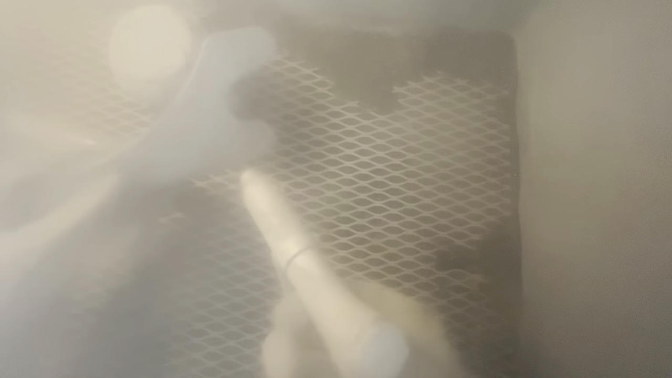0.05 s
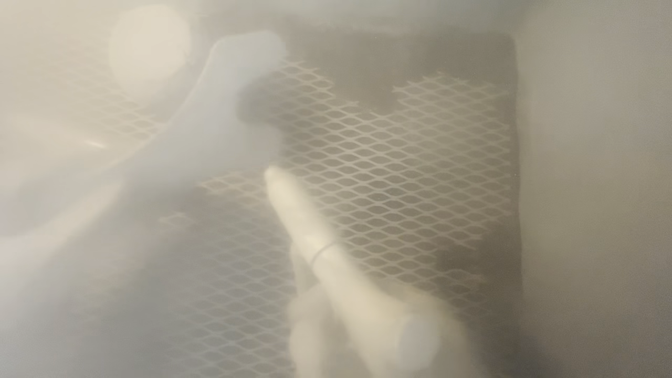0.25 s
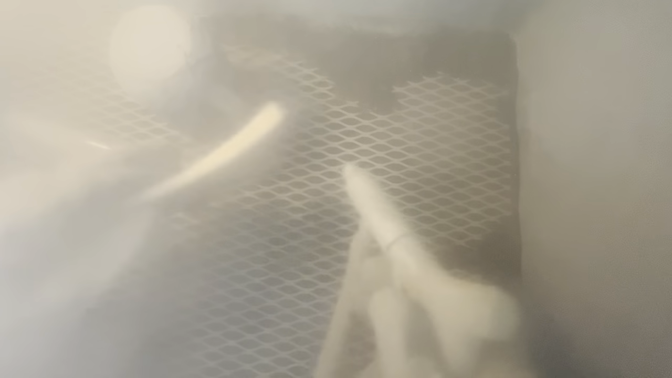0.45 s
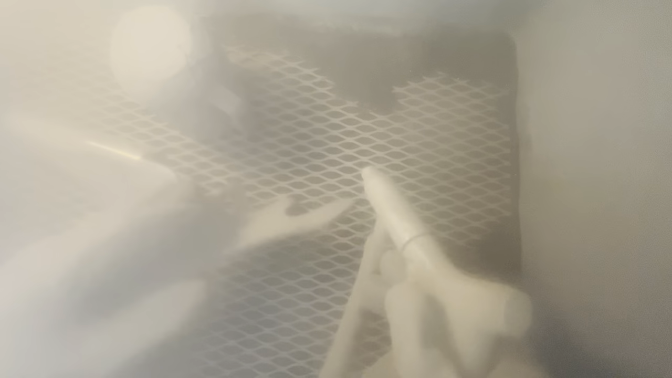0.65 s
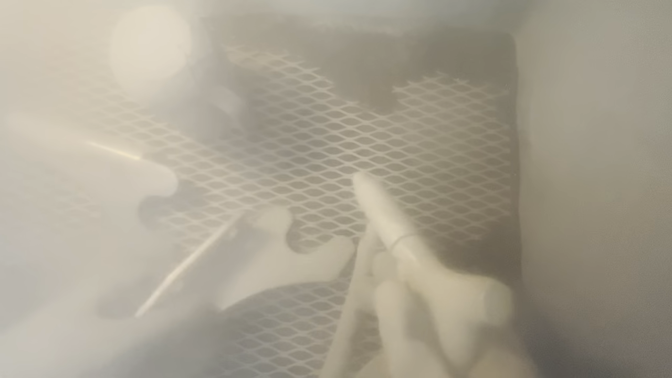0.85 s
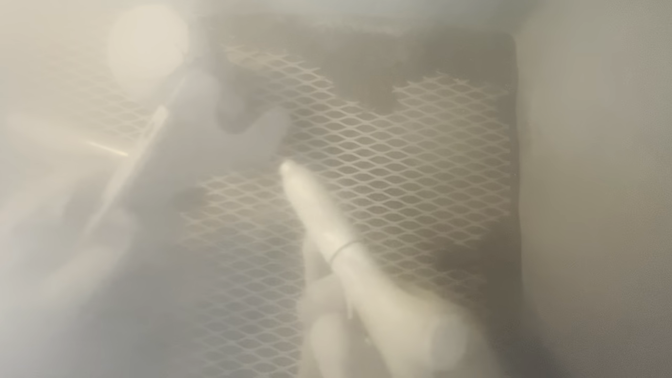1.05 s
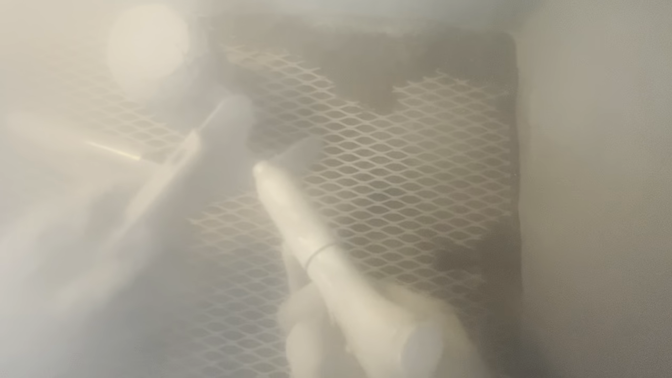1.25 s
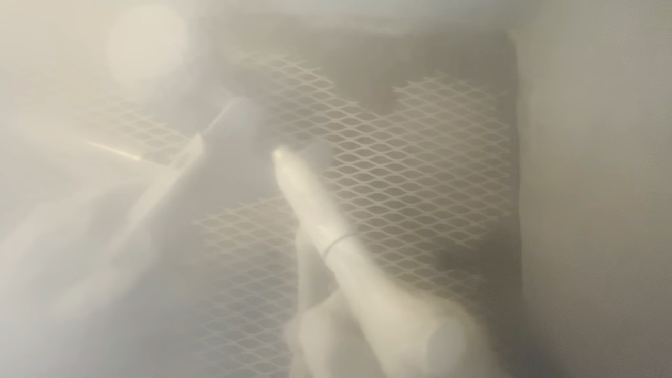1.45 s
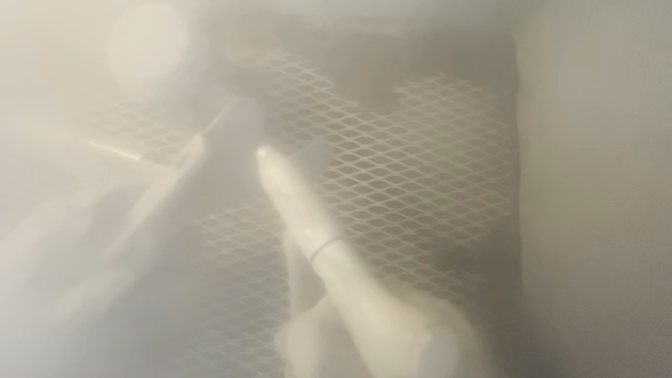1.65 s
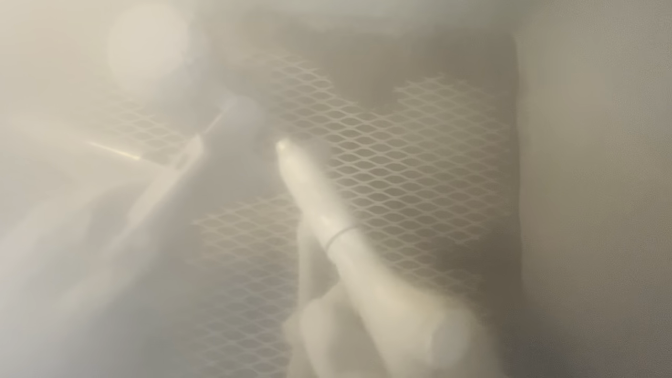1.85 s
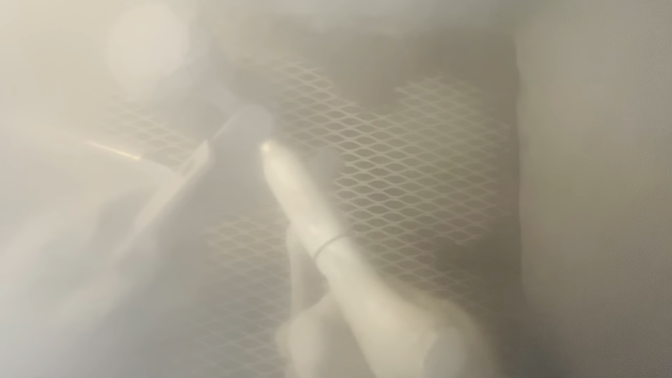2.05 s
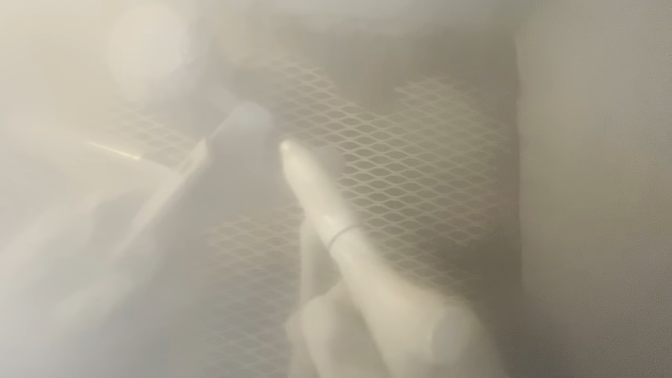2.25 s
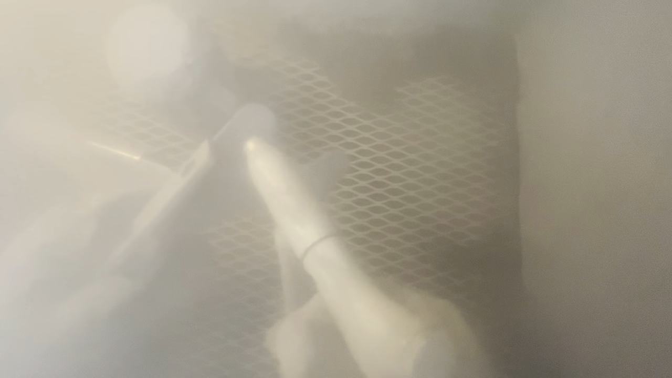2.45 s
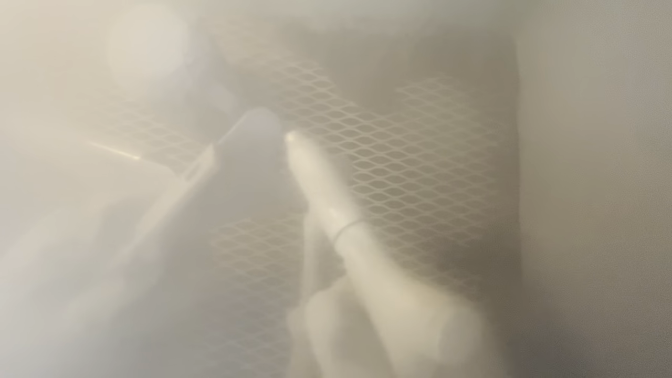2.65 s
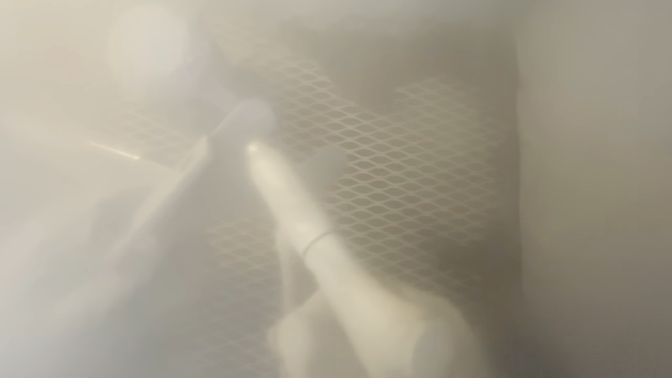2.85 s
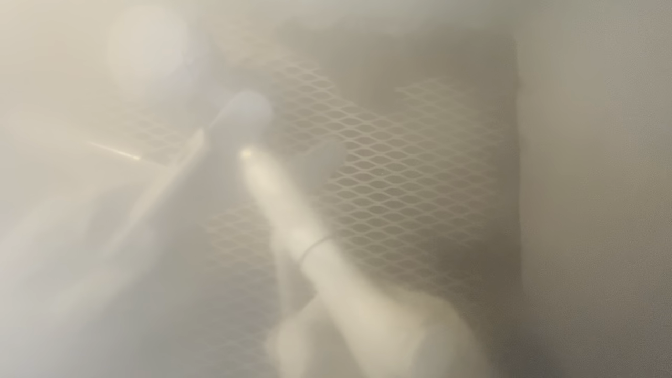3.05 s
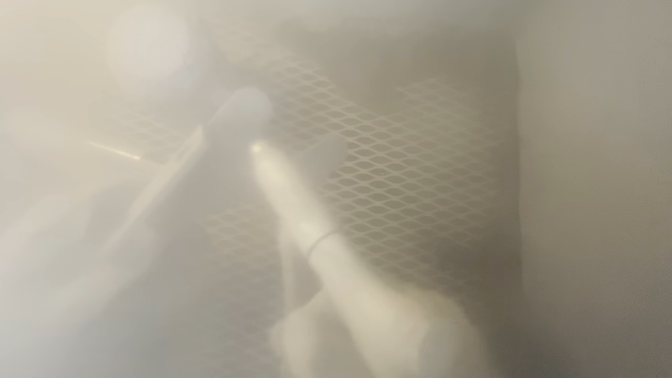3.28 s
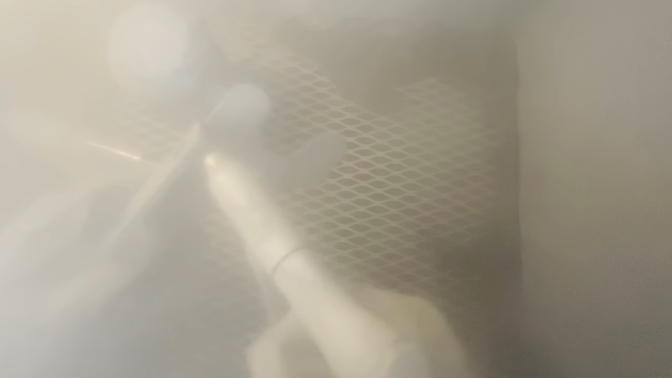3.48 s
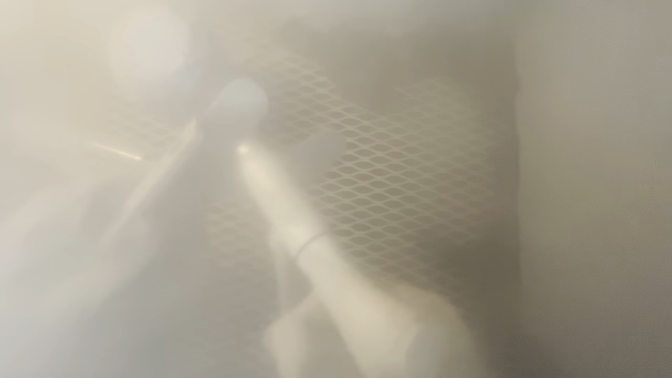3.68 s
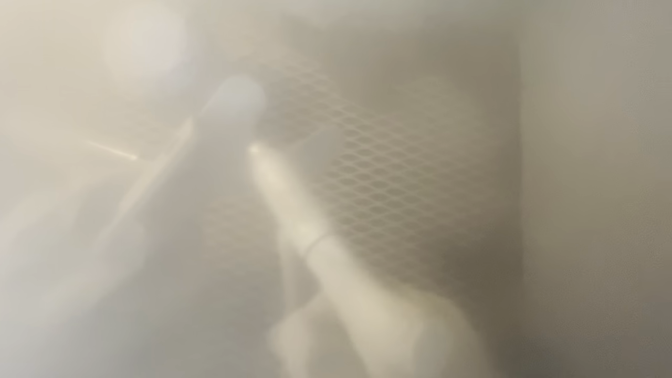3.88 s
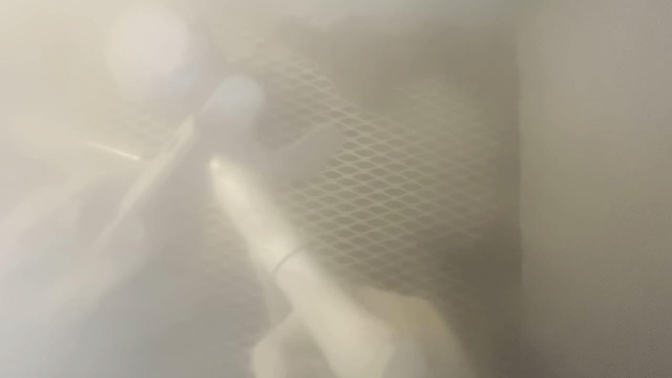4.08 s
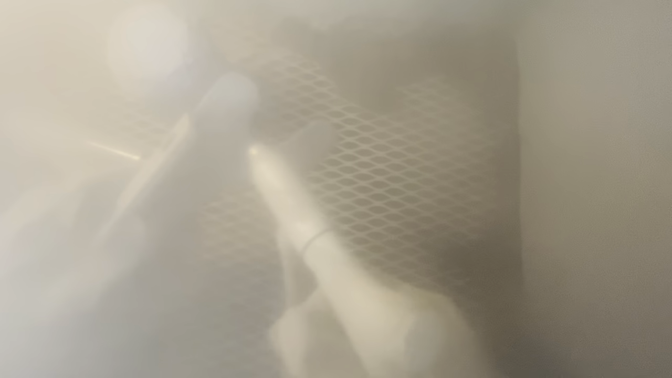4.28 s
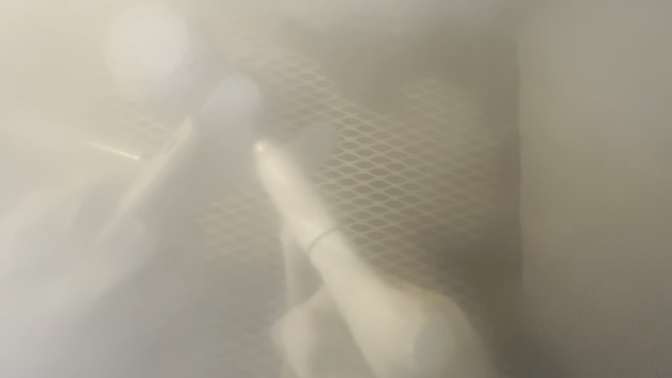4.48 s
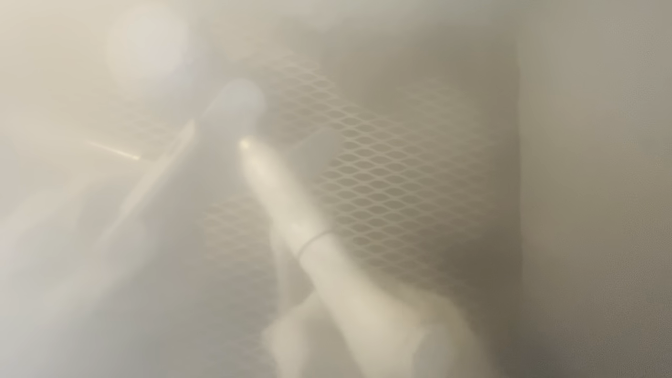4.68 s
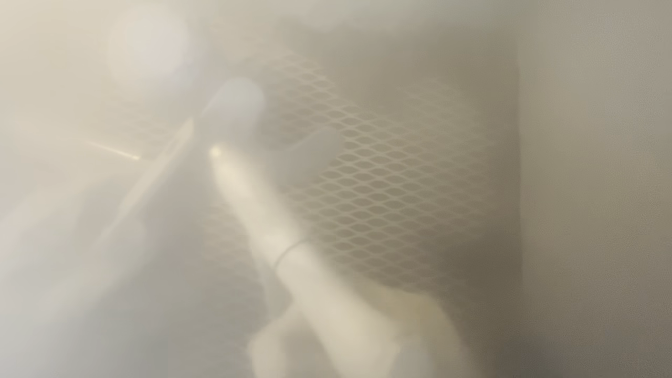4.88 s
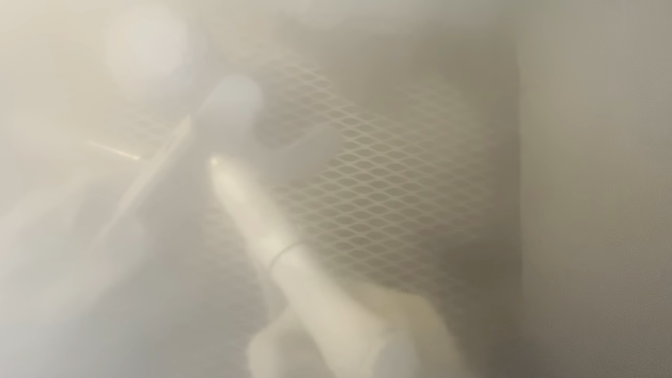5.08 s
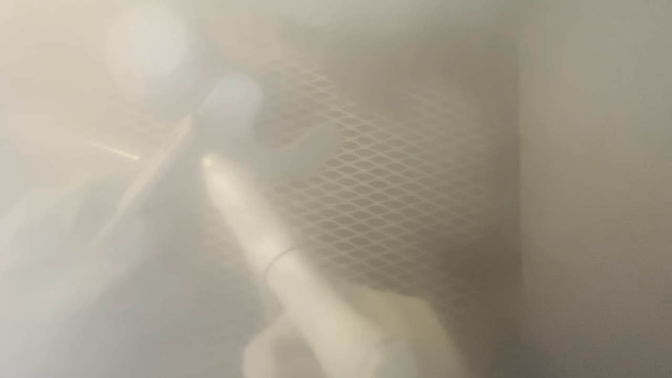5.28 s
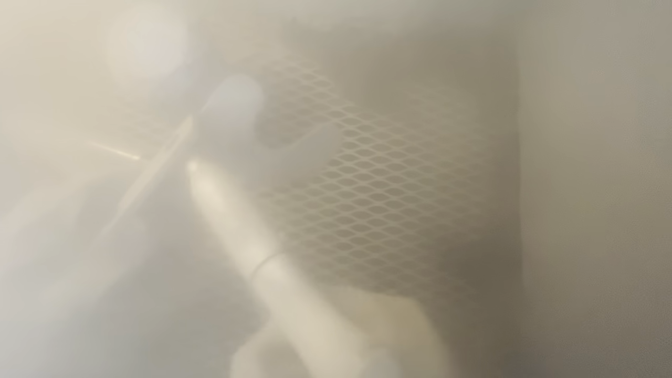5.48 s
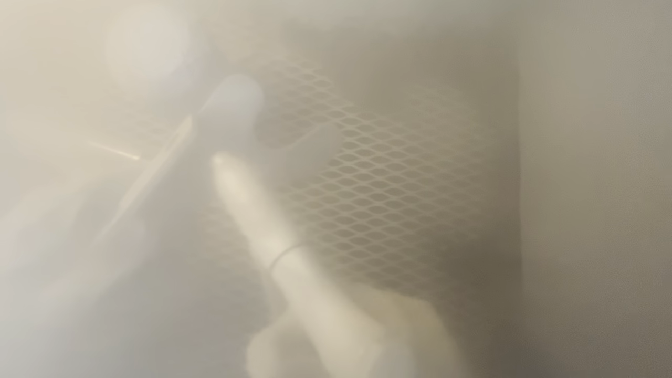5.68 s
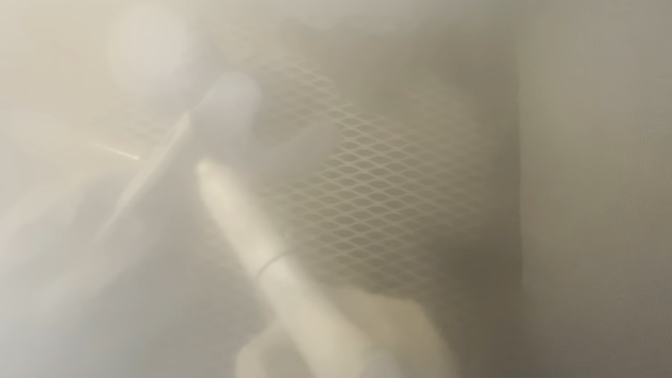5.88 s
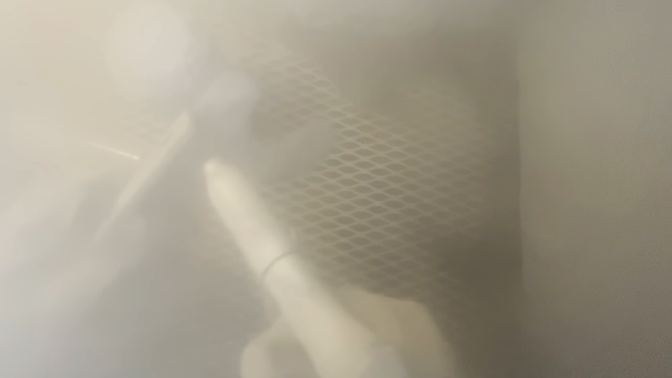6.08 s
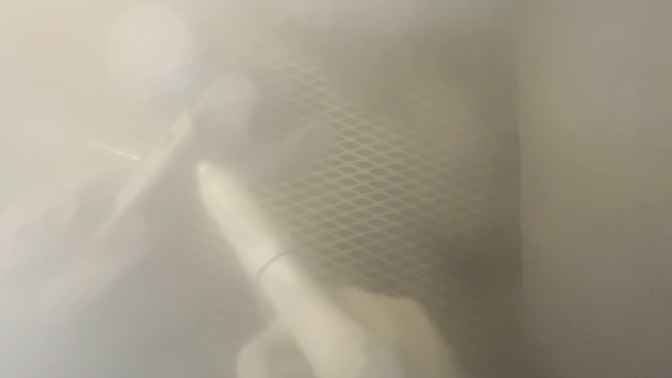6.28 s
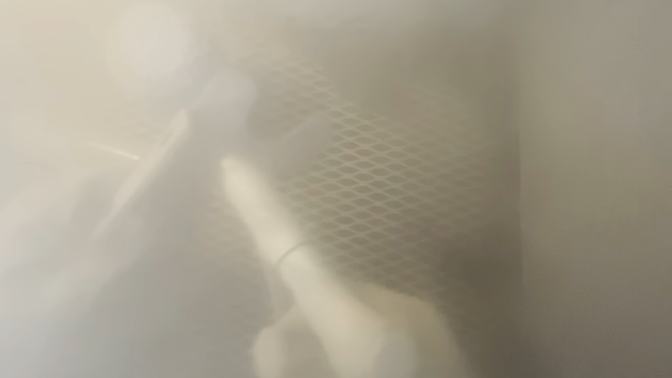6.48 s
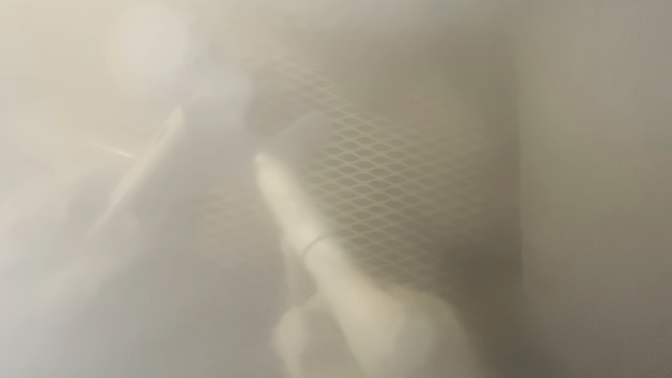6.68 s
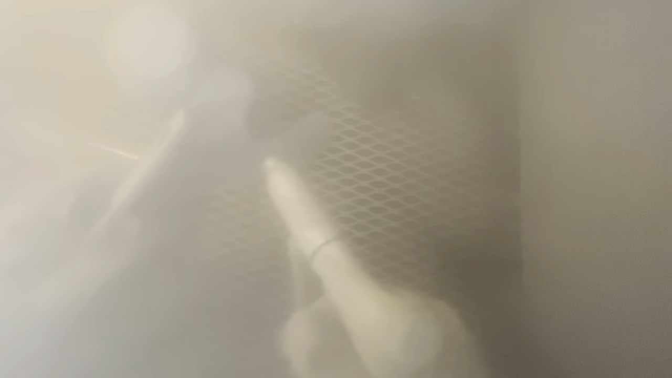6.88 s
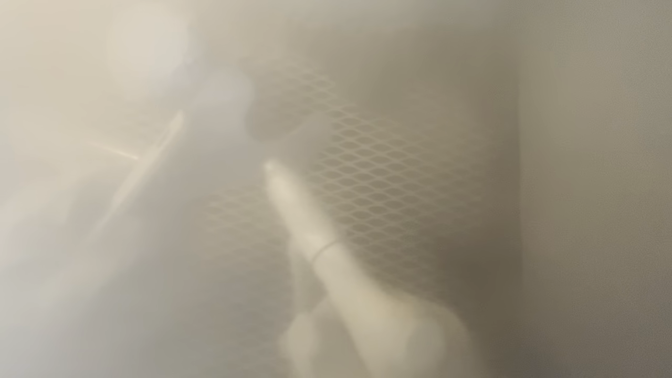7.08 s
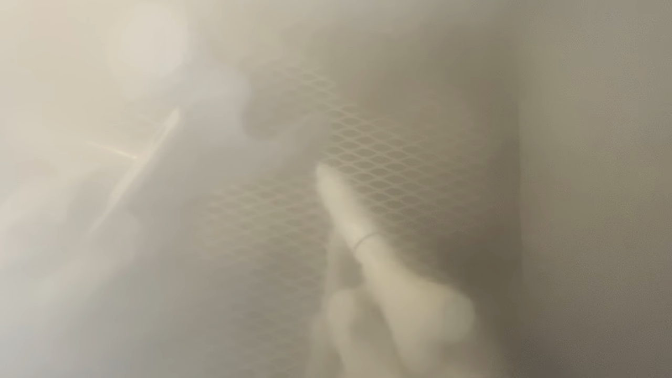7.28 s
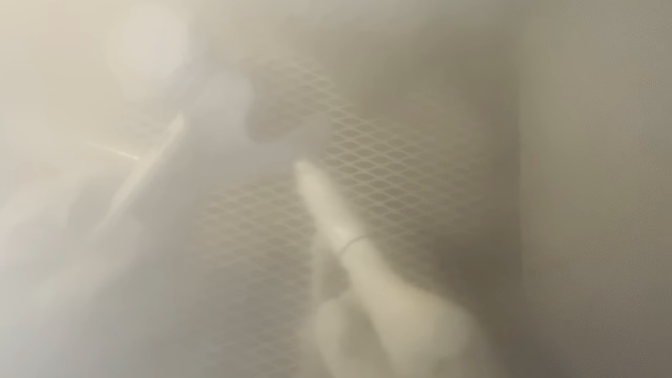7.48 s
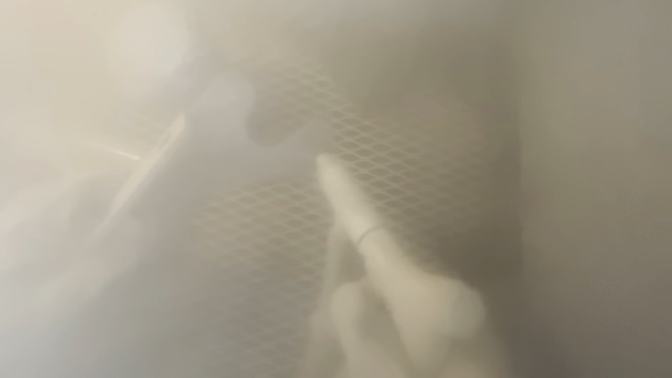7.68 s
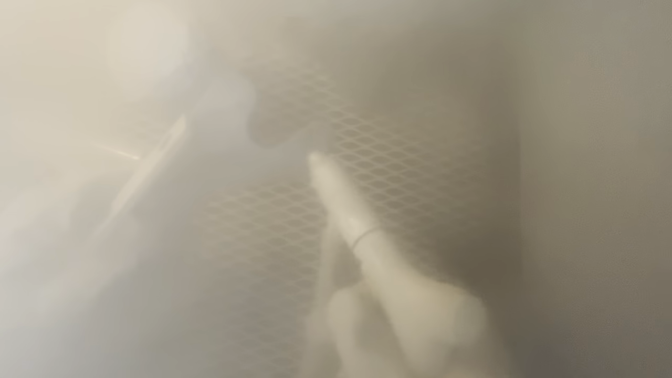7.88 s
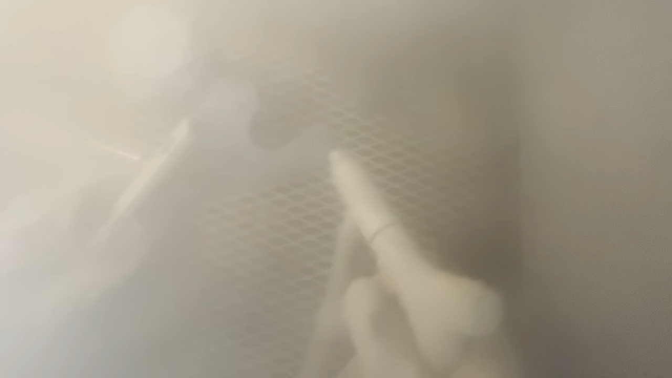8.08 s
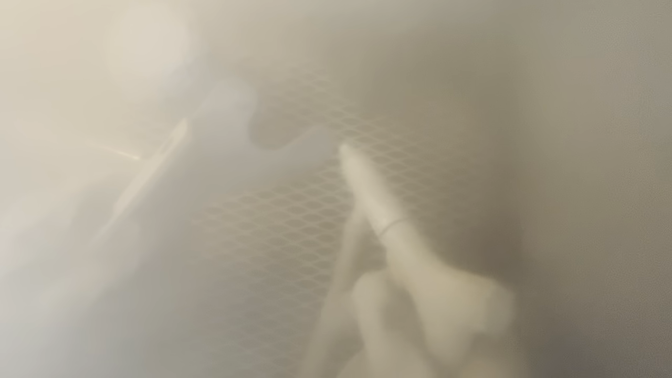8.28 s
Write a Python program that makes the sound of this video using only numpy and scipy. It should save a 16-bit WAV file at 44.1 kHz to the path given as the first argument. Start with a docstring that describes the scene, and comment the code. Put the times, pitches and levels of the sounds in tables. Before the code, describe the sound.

After soft airflow and two dull bumps, a sandblaster sprays grit on a steel part with a loud, steady hiss inside a cabinet.

```python
"""A garage, a stereo microphone close to a blast cabinet in which a steel part is sandblasted.
First air rushes through the cabinet; the part is turned and bumps twice. At 1.3 s the trigger opens
with a puff and the jet hisses on. From then on jet, grit and the roar of air on the part ring in the
cabinet, whose resonances change with the aim of the gun, while the tank slowly drains."""
import sys
import numpy as np
from scipy import signal
from scipy.fft import rfft, irfft
from scipy.io import wavfile
from scipy.ndimage import uniform_filter1d

SR = 44100
rng = np.random.default_rng(int(sys.argv[2]) if len(sys.argv) > 2 else 0)


def output_pcm(signal):
    """Save a mono or channel-first signal as 16-bit PCM at the path in sys.argv[1].

    Samples are clipped to [-1, 1] before scaling.
    """
    pcm = np.clip(np.atleast_2d(signal).T, -1, 1) * 32767
    wavfile.write(sys.argv[1], SR, np.round(pcm).astype(np.int16))


N = 367794
T = np.arange(N) / SR
HZ = np.maximum(np.arange(N // 2 + 1) * SR / N, 1)
TRIGGER_S = 1.264

# how idle air and scuffs reach the microphones: (frequency [Hz], left minus right [dB])
AIR_BALANCE = [(60, 0.96), (110, 4.6), (200, 4.5), (380, 6.4), (700, 1.9), (1290, 6.2), (2380, 0.83),
               (4400, 8.7), (8120, 4.8), (15000, 0.5)]
# how the blast reaches them: (frequency [Hz], left minus right [dB])
JET_BALANCE = [(60, 4), (200, 7), (380, 8), (700, -0.5), (1290, 2), (1800, 11), (2800, 6), (4200, 5.5),
               (5600, 14), (7200, 9.5), (8800, -1.5), (10000, -2.5), (12000, 0)]
# modes of the bumped cabinet: (frequency [Hz], width [Hz], relative level [dB])
BUMP_MODES = [(121, 40, -12), (168, 27, -7), (257, 27, 2), (340, 46, -5), (393, 32, 1.5), (525, 50, -11),
              (920, 58, 0.5), (1164, 45, -2), (1400, 50, 0), (1510, 57, 0), (1680, 70, -7), (1890, 130, -7),
              (2320, 120, -12)]


def undb(db):
    """Decibels to gain."""
    return 10 ** (np.asarray(db) / 20)


def unit(x):
    """Scale so that the mean of the channels has rms 1."""
    return x / np.std(np.atleast_2d(x).mean(axis=0))


def curve(rows, column=1):
    """One column of a table, joined by straight lines in time."""
    rows = np.array(rows)
    return np.interp(T, rows[:, 0], rows[:, column])


def across(points):
    """(frequency [Hz], value) points joined on a log-frequency axis."""
    hz, value = np.transpose(points)
    return np.interp(np.log(HZ), np.log(hz), value)


def bell(hz, width):
    """Power response of one resonance."""
    return 1 / (1 + (2 * (HZ - hz) / width) ** 2)


def colour(x, gain):
    """Filter by a gain at each frequency."""
    return irfft(rfft(x) * gain, N)


def ramp(start, length):
    """Rises from 0 to 1."""
    return np.clip((T - start) / length, 0, 1)


def walk(rate):
    """Smooth random drift with spread 1, changing about rate times a second."""
    step = max(int(SR / rate), 1)
    held = rng.standard_normal(8192)[np.arange(N) // step % 8192]
    return unit(uniform_filter1d(held, step))


def blows(rows):
    """Force of soft contacts: each swells and dies away."""
    return sum(undb(db) * np.exp(-np.maximum((s - T) / rise, (T - s) / decay))
               for s, db, rise, decay in rows)


def noise():
    """Unrelated turbulence for left and right."""
    return rng.standard_normal((2, N))


def at_mics(x, gain, balance, alike=1):
    """Colour a source and place it between the two microphones; rms 1."""
    # how alike the two sides hear when alike is 1: (frequency [Hz], correlation)
    likeness = [(40, .2), (130, .45), (300, .7), (500, .35), (900, .6), (1300, .92), (1800, .92),
                (2400, .45), (9000, .5), (11000, .85), (15000, .85)]
    turn = np.arcsin(np.clip(alike * across(likeness), -.95, .95)) / 2
    spectrum = rfft(x)
    spectrum = np.cos(turn) * spectrum + np.sin(turn) * spectrum[::-1]
    sides = undb(across(balance) * np.array([[.5], [-.5]]))
    return unit(irfft(spectrum * gain * sides / np.hypot(*sides), N))


def reflections(t60, wet):
    """Response of the steel box at each microphone: direct sound and a short dense tail."""
    tail = rng.standard_normal((2, 8192)) * undb(-60 * T[:8192] / t60)
    tail /= np.linalg.norm(tail, axis=1, keepdims=True)
    return (1 + wet * rfft(tail, N)) / np.hypot(1, wet)


def idle_air(leak_db=-40, rush_db=-36, rush_end_s=.57):
    """Air streams through the cabinet before the trigger, with a deeper rush at first."""
    # spectra of the two streams: (frequency [Hz], relative level [dB])
    leak_spectrum = [(25, -14), (50, -1.5), (120, -3), (170, -12), (340, -2), (570, -7.5), (800, -3),
                     (1150, -0.5), (1450, -2), (1800, -7.5), (2500, -10.5), (3300, -16), (4900, -12.5),
                     (9000, -20), (12000, -27.5), (15000, -33)]
    rush_spectrum = [(30, -43), (70, -6), (120, -8), (190, -10), (260, -1), (340, 1), (440, 1), (600, -3),
                     (780, 1.5), (1000, -6.5), (1450, -4.5), (1750, -16), (3000, -28), (8000, -45)]
    # the level dips briefly: (time [s], level [dB])
    dip = [(.525, 0), (.545, -12), (.555, -35), (.565, -19), (.587, -0.5)]
    box = reflections(t60=.087, wet=.56)
    leak = at_mics(noise(), undb(across(leak_spectrum)) * box, AIR_BALANCE, alike=.3)
    leak *= undb(leak_db + .17 * walk(8.2)) * (1 - ramp(TRIGGER_S, .37))
    rush = at_mics(noise(), undb(across(rush_spectrum)) * box, AIR_BALANCE, alike=.5)
    rush *= undb(rush_db + .3 * walk(19)) * (1 - ramp(rush_end_s, .023))
    return (leak + rush) * undb(curve(dip))


def wall_thuds(wall_hz=114):
    """The cabinet wall thuds softly, hardest under the first puff of air."""
    # pushes on the wall: (time [s], level [dB], rise [s], decay [s])
    thuds = [(.59, -38, 0.0067, 0.0091), (.771, -41, 0.0063, 0.018), (1.283, -27, 0.0048, 0.012),
             (3.27, -51, .025, .04), (4.2, -51, .03, .07), (4.535, -48, 0.011, 0.046)]
    return np.sqrt(2) * np.sin(2 * np.pi * wall_hz * T) * blows(thuds)


def scuffs(dull_hz=3200, floor_db=-20):
    """The part scuffs as it bumps and is turned: friction noise through the cabinet's modes."""
    # soft contacts: (time [s], level [dB], rise [s], decay [s])
    bumps = [(.744, -23.5, 0.0063, 0.012), (.769, -38, 0.0065, 0.0071), (.8, -41, .004, 0.04),
             (.905, -34, 0.0081, 0.015)]
    mode_power = sum(undb(db) ** 2 * bell(hz, width) for hz, width, db in BUMP_MODES)
    body = np.sqrt(undb(floor_db) ** 2 + mode_power)
    return at_mics(noise(), body / (1 + (HZ / dull_hz) ** 2), AIR_BALANCE) * blows(bumps)


def knocks(soft_hz=1500):
    """Each contact sets the cabinet's modes ringing; the gloved grip softens the blow."""
    # hard contacts within the bumps: (time [s], relative level [dB])
    contacts = [(0.744, -34), (0.757, -33), (0.769, -33), (0.9052, -35), (.913, -37)]
    age = T[:SR // 2]
    ring = sum(undb(db) * np.exp(-np.pi * width * age) * np.sin(2 * np.pi * hz * age)
               for hz, width, db in BUMP_MODES)
    out = np.zeros(N)
    for s, db in contacts:
        start = int(s * SR)
        out[start:start + len(age)] += undb(db) * ring / 2
    return signal.sosfilt(signal.butter(2, soft_hz, fs=SR, output="sos"), out)


def pressure(surge_db, settle_s, sag_db_per_s):
    """Level in dB: line pressure surges at the trigger, settles, then sags as the tank drains."""
    held_s = np.maximum(T - TRIGGER_S, 0)
    return surge_db * np.exp(-held_s / settle_s) - sag_db_per_s * held_s


def hiss(contact_db, level_db=-26):
    """The turbulent jet hisses as it leaves the nozzle."""
    # jet noise: (frequency [Hz], relative level [dB])
    spectrum = [(1500, -25.5), (2600, -13.5), (3200, -2), (4200, -5), (4900, -2.5), (5700, 1), (7400, 0.5),
                (8500, -6), (10000, -11.5), (13000, -43)]
    supply_db = pressure(surge_db=6, settle_s=.3, sag_db_per_s=.4235)
    air = at_mics(noise(), undb(across(spectrum)), JET_BALANCE)
    return air * undb(level_db + supply_db + .27 * contact_db + .27 * walk(25))


def roar(contact_db, level_db=-32):
    """Air roars on the part, loudest when it hits squarely."""
    # air on steel: (frequency [Hz], relative level [dB])
    spectrum = [(400, -38), (760, -16), (1000, -13), (1300, -7.5), (1620, -5.5), (2100, -3), (2600, -7),
                (3200, -6.5), (5000, -41)]
    supply_db = pressure(surge_db=6.5, settle_s=1, sag_db_per_s=.1815)
    air = at_mics(noise(), undb(across(spectrum)), JET_BALANCE)
    return air * undb(level_db + supply_db + contact_db)


def grit(contact_db, level_db=-27.5):
    """Countless impacts of sieved abrasive, close in size."""
    # grains on steel: (frequency [Hz], relative level [dB])
    spectrum = [(3000, -23.5), (6000, -21), (7500, -13), (8800, 7), (9900, -1), (10600, -5), (11300, -1),
                (12000, -6.5), (13000, -5.5), (14300, -22), (15500, -6.5)]
    supply_db = pressure(surge_db=4.8, settle_s=.19, sag_db_per_s=.4033)
    impacts = noise() * undb(.9 * np.minimum(rng.exponential(size=N), 5))
    spray = at_mics(impacts, undb(across(spectrum)), JET_BALANCE)
    return spray * undb(level_db + supply_db + .07 * contact_db + .49 * walk(22))


def rumble(contact_db, level_db=-48, drone_hz=328, drone_db=4):
    """The cabinet rumbles under the jet and drones at one resonance."""
    # cabinet rumble: (frequency [Hz], relative level [dB])
    spectrum = [(15, -40), (45, -14), (115, 2.5), (170, 0.5), (230, -0.5), (335, 2), (480, -0.5), (650, -4),
                (1000, 3), (2000, -34)]
    supply_db = pressure(surge_db=7, settle_s=.84, sag_db_per_s=.1983)
    body = at_mics(noise(), undb(across(spectrum) + drone_db * bell(drone_hz, 27)), JET_BALANCE)
    return body * undb(level_db + supply_db + .16 * contact_db)


def whistles(x, lower_hz=5600, upper_hz=7500, width_hz=520):
    """Two whistling bands of the hiss flare and fade as the nozzle wanders over the part."""
    # lift of the bands: (time [s], lower [dB], upper [dB])
    lifts = [(1.3, 2.5, -5), (1.7, 1, -.5), (2.4, -4, 3), (2.8, -2, 0), (3.3, 1, 1), (3.66, 3.3, -1),
             (3.95, -1, 1.5), (4.37, 2.8, 0), (4.62, -2, -1), (5.55, -0.5, -1), (5.76, -1.2, 1.5),
             (6.05, 0, 1), (6.8, .5, -1.5), (7.42, -2.5, -2), (7.9, 0, 1)]
    return x + sum((undb(curve(lifts, column)) - 1) * colour(x, bell(hz, width_hz))
                   for column, hz in enumerate((lower_hz, upper_hz), 1))


def shimmer(x, depth=.12, lags_s=(.0011, .0023, .0047, .0083)):
    """A wavering comb filter gives the jet a shifting, hollow colour."""
    return x + sum(depth * walk(7) * np.roll(x, int(lag * SR), axis=1) for lag in lags_s)


def cabinet(x):
    """Each aim of the gun wakes its own standing waves; they blend as the hand moves."""
    # resonances for each aim; a negative lift is a node at the microphone:
    # (frequency [Hz], width [Hz], lift before each side's share [dB])
    on_face = [(1380, 65, 4.0), (1600, 65, 6.9), (1750, 40, 5.9), (1810, 50, 6.6), (1930, 40, 2.3),
               (2040, 40, 4.8), (2120, 40, -4.2), (2280, 50, -3.3), (2420, 50, 7.7), (2520, 65, -5.6),
               (3130, 170, -6.6), (3460, 130, -4.6), (4130, 80, -3.7), (4810, 130, 6.8), (5280, 50, 6.2),
               (5430, 80, -4.7), (5970, 130, -3.7), (6240, 100, 5.6), (6390, 40, -5.1), (7260, 40, -5.1),
               (7460, 80, -5.4), (8100, 50, 3.9), (8860, 170, -4.2), (9190, 170, -3.6)]
    on_neck = [(1390, 65, 4.7), (1580, 65, 4.6), (1670, 40, 5.2), (1760, 50, 8.2), (1840, 40, 6.9),
               (1900, 40, -4.7), (2040, 40, 3.0), (2150, 40, 4.7), (2250, 40, -4.9), (2420, 40, 6.5),
               (2530, 65, -4.3), (3090, 170, -8.3), (3430, 130, -5.3), (4800, 65, 6.2), (5010, 100, 4.3),
               (5360, 40, 4.8), (5640, 80, 4.0), (5840, 65, -4.6), (6340, 50, -4.7), (7700, 170, 4.0),
               (8800, 100, -5.4), (9010, 170, -5.5)]
    on_first_jaw = [(1300, 50, 4.5), (1390, 40, 5.9), (1490, 65, 3.0), (1590, 50, 5.2), (1670, 50, 5.5),
                    (1760, 50, 10.7), (1840, 40, 7.4), (1960, 80, -2.0), (2140, 50, 9.1), (2420, 40, 6.7),
                    (2740, 40, 4.9), (3100, 130, -6.1), (3430, 130, -4.3), (4790, 100, 6.6),
                    (4990, 80, 4.5), (5140, 40, 4.3), (5360, 65, 4.6), (5630, 80, 6.9), (5740, 50, 7.6),
                    (5880, 65, -4.1), (6190, 130, 4.1), (6520, 65, 3.3), (6770, 80, 4.3), (7360, 65, 5.7),
                    (7610, 100, 6.2), (8020, 40, -4.7), (8120, 80, 3.8), (8560, 130, 2.8), (8830, 65, -4.5),
                    (9050, 50, -6.6)]
    between_jaws = [(1340, 50, 5.5), (1580, 130, 6.8), (1780, 40, 6.4), (2010, 130, 5.3), (2200, 65, 6.7),
                    (2440, 65, 5.7), (2740, 100, -5.4), (2960, 40, 9.1), (3170, 170, -4.8),
                    (3810, 100, 4.8), (4050, 65, 5.6), (4820, 80, 4.8), (6610, 100, 6.3), (7290, 80, 5.0),
                    (8310, 40, 3.9), (9140, 170, -4.5)]
    on_second_jaw = [(1340, 40, 6.0), (1530, 80, 8.5), (1630, 65, 6.2), (1780, 40, 6.0), (1840, 40, -5.6),
                     (1950, 50, 7.0), (2060, 50, 5.2), (2200, 65, 8.0), (2480, 50, 5.9), (3200, 100, -6.3),
                     (3440, 65, -6.2), (3560, 40, 6.3), (4050, 50, 4.6), (4360, 65, 5.6), (4750, 170, 4.1),
                     (5310, 50, 7.3), (5450, 65, 9.5), (5940, 170, -4.7), (6120, 65, 7.3), (6590, 170, 5.2),
                     (7270, 100, 4.4), (7910, 100, 5.9), (9000, 65, -7.2), (9190, 170, -4.7)]
    # the hand moves on to the next aim: (middle [s], length [s])
    moves = [(2.66, 0.22), (4.19, .25), (6.983, .12), (7.47, .14)]
    reached = [np.ones(N)] + [ramp(s - length / 2, length) for s, length in moves] + [np.zeros(N)]
    aim_shares = -np.diff(reached, axis=0)  # add up to 1
    side_shares = np.array([[1.07], [.82]])
    wet = np.array([[.2], [.45]])  # the right microphone faces away from the jet and hears more wall
    spectrum, out = rfft(x), 0
    for modes, share in zip((on_face, on_neck, on_first_jaw, between_jaws, on_second_jaw), aim_shares):
        lift_db = sum(db * bell(hz, width) for hz, width, db in modes)
        standing = undb(lift_db * side_shares)
        out = out + share * unit(irfft(spectrum * standing * reflections(t60=.08, wet=wet), N))
    return out * np.std(x.mean(axis=0))


def buffets():
    """The jet catches an edge and buffets the cabinet with a deeper roar."""
    # that roar: (frequency [Hz], relative level [dB])
    spectrum = [(40, -12), (110, -1), (175, 1), (260, -11), (370, 3), (560, -15), (900, -7), (1350, 10),
                (1750, 7), (2400, 0), (5000, -40)]
    # edges caught: (time [s], level [dB], rise [s], decay [s])
    gusts = [(1.32, -28, 0.029, 0.031), (1.5, -34, 0.02, 0.051), (2.09, -36.5, 0.14, 0.091),
             (2.72, -37.5, 0.078, .05), (3.77, -35, 0.027, 0.025), (4.07, -42, .02, 0.061),
             (4.25, -35, 0.14, 0.12), (7.31, -43, .08, .015)]
    return at_mics(noise(), undb(across(spectrum)), JET_BALANCE) * blows(gusts)


def off_part(abruptness=5.8):
    """Decibels of roar lost while the jet misses the part."""
    # slips off the edge: (middle [s], length [s], depth [dB])
    slips = [(1.43, 0.071, 5), (1.574, 0.064, 4), (2.318, 0.099, 5), (2.54, 0.16, 4), (2.856, 0.14, 1.5),
             (3.881, 0.15, 4.5), (3.993, .09, 5.5), (4.117, 0.09, 5), (5.97, 0.12, 5.5), (7.428, 0.17, 4.5)]
    return sum(db * np.exp(-np.abs(2 * (T - s) / length) ** abruptness) for s, length, db in slips)


def blast(feed_db=.74, flutter_db=.18, tremble_db=.1, opening_s=.013):
    """The valve opens and the jet plays on the part; the abrasive feeds unevenly, the hand trembles."""
    # the jet swells and eases slightly: (time [s], level [dB])
    jet_swell = [(1.28, 1.5), (1.42, 1), (1.5, 2), (1.6, 0.7), (1.9, 0.5), (2.1, 0.9), (2.45, 1),
                 (2.58, -.5), (2.72, 0.6), (2.9, 0.4), (3.63, 0), (3.9, -0.8), (4.42, -0.2), (4.6, 0.2),
                 (5.8, 0.6), (6.3, 0.1), (6.9, 0.5), (7.15, -0.5), (7.4, 0.5), (7.7, -0.2)]
    feed = undb(feed_db * walk(24) + flutter_db * walk(90))
    contact_db = tremble_db * walk(10) - off_part()  # how squarely the jet hits
    treble = whistles(hiss(contact_db) + grit(contact_db))
    jet = feed * undb(curve(jet_swell)) * shimmer(treble + roar(contact_db))
    valve = ramp(TRIGGER_S, opening_s) ** 2
    return (cabinet(jet + buffets()) + rumble(contact_db)) * valve


def scene():
    """Idle air, handling and the blast, which reaches the left microphone a moment later."""
    # delay by way of the cabinet walls: (frequency [Hz], lag [s])
    left_lag = [(400, 0), (650, .0006), (1100, .00022), (1400, .0001), (1800, .00012), (2500, .00009),
                (3200, .00016), (4200, .000225), (9000, .00025)]
    left, right = blast()
    late_left = colour(left, np.exp(-2j * np.pi * HZ * across(left_lag)))
    handling = scuffs() + (wall_thuds() + knocks()) * undb([[1.5], [-1.5]])
    return idle_air() + handling + np.array([late_left, right])


def record(dry, top_hz=15650):
    """The recorder rounds the highest peaks and cuts the top."""
    return signal.sosfilt(signal.ellip(10, .2, 80, top_hz, fs=SR, output="sos"), np.tanh(dry))


dry = scene()
out = record(dry)
output_pcm(out)
```